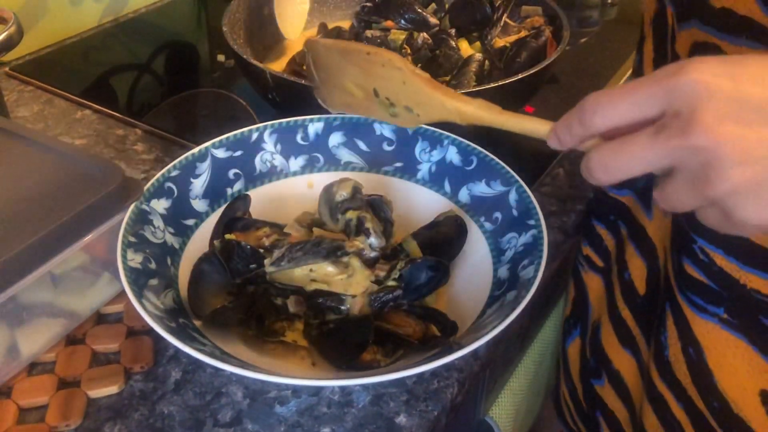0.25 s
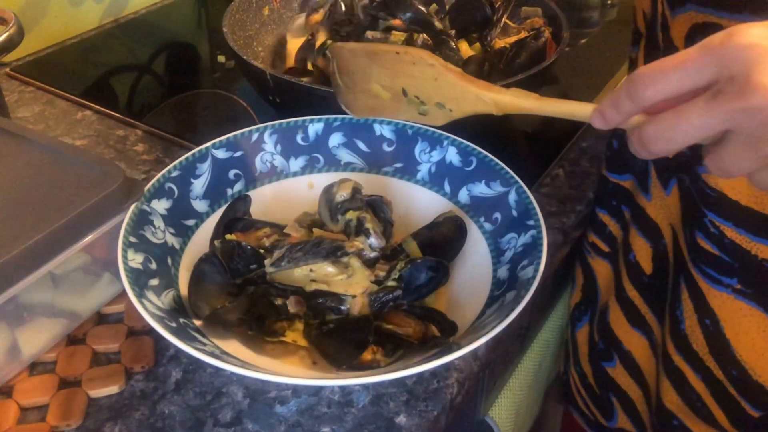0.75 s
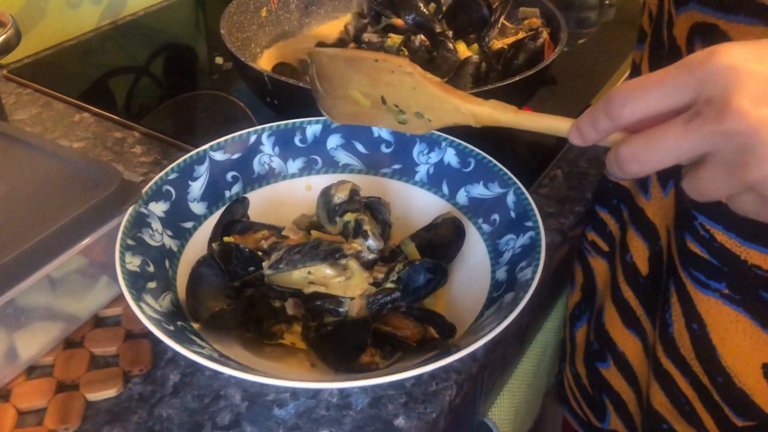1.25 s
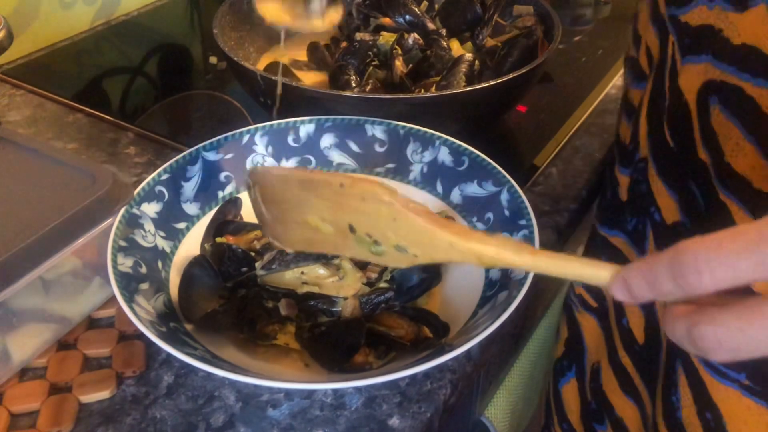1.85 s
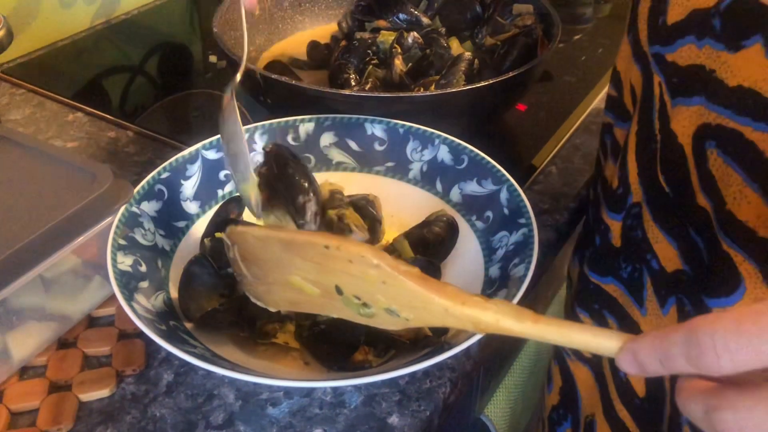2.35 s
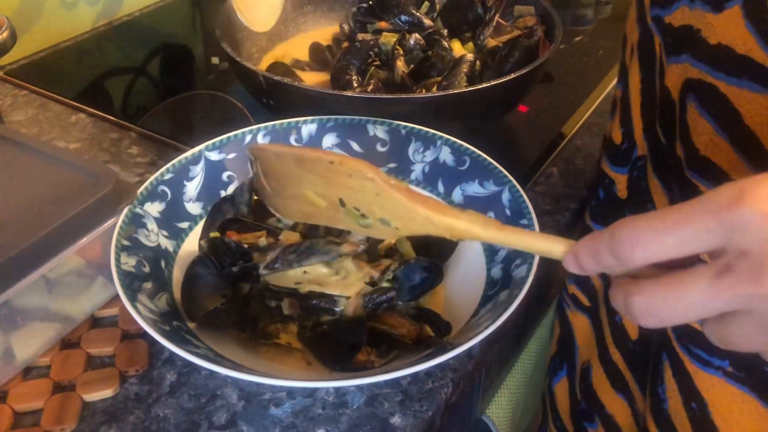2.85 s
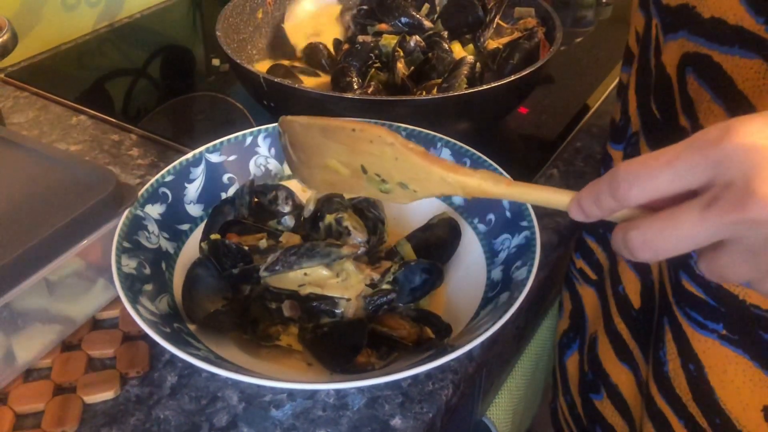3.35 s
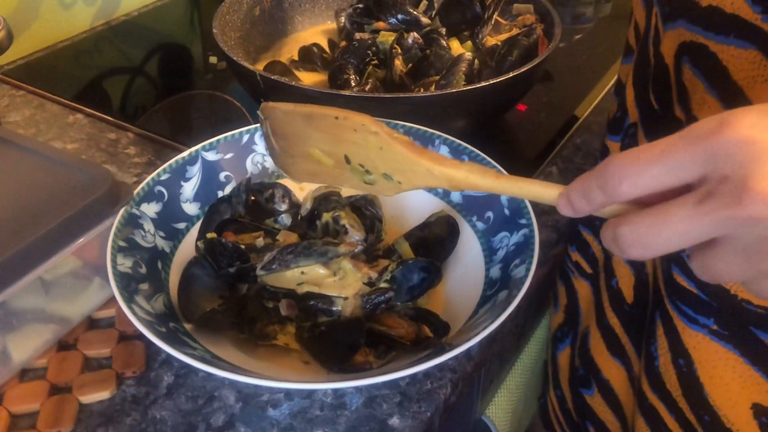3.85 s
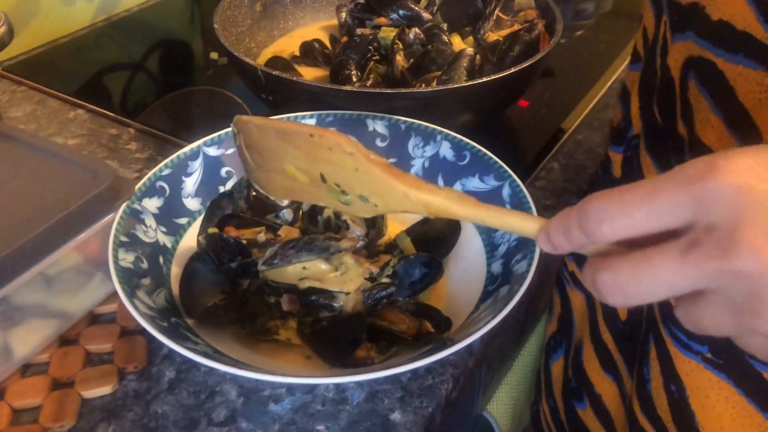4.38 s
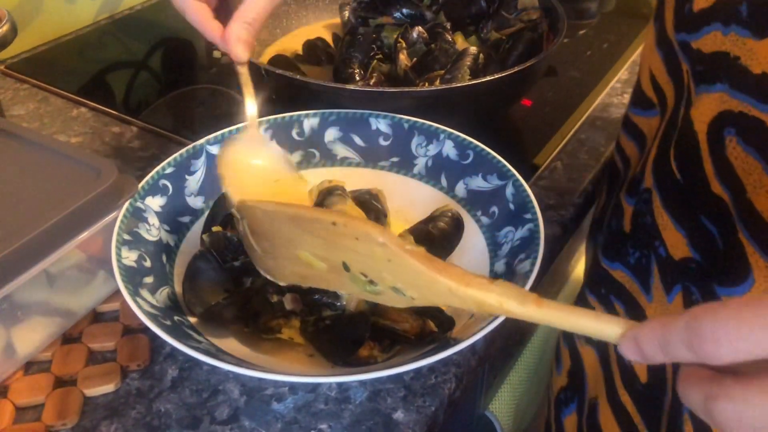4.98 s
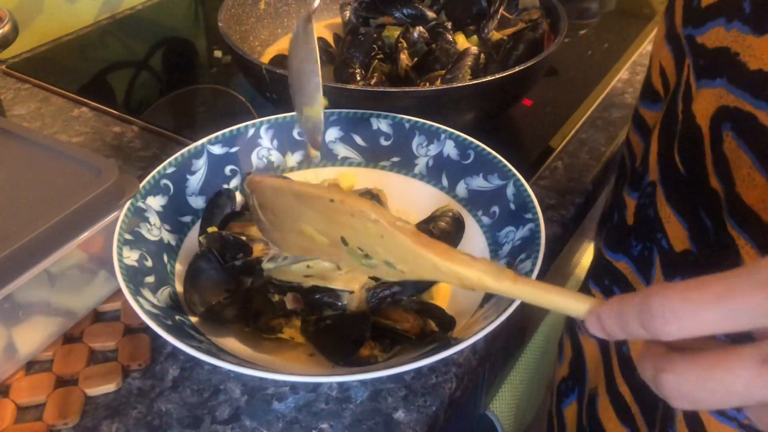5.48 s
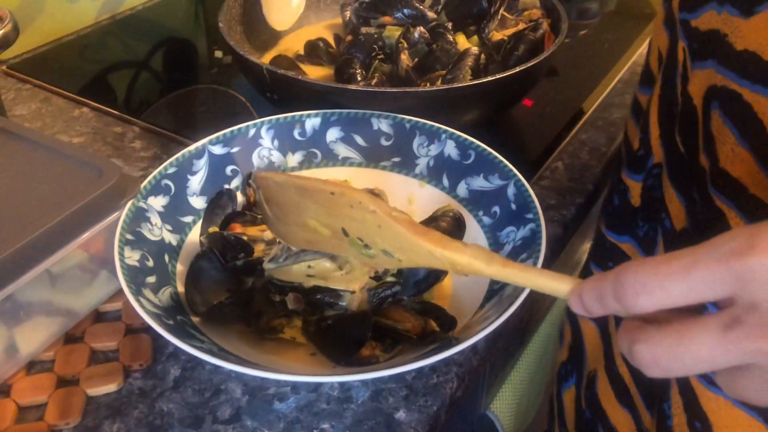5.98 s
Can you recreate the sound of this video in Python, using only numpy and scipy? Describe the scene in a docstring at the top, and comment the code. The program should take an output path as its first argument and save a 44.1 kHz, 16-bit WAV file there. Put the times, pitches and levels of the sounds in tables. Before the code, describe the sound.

Sharp, hollow shell clatter in uneven bursts, with dull pot knocks, a brief spoon ting and faint bowl ring, close in a hard-surfaced kitchen.

```python
"""Mussel shells clack and slide as a steel spoon ladles them from a pot into a ceramic bowl, in a small hard kitchen.
Clacks are short cracks of noise with two shell resonances; slides are swells of gritty noise.
The pot, spoon and bowl ring as sets of fading sine tones; the food knocks and the counter thumps as low noise.
Dense kitchen echoes follow the shells and pot, over quiet rumble, hiss and a thin whine, all in close mono."""
import sys
import numpy as np
from scipy import signal
from scipy.fft import rfft, irfft
from scipy.io import wavfile

SR = 44100
rng = np.random.default_rng(int(sys.argv[2]) if len(sys.argv) > 2 else 0)


def to_linear_factor(level_db):
    """Convert decibel levels (scalar or array-like) to linear amplitude factors."""
    exponent = np.asarray(level_db, float) / 20
    return 10 ** exponent


def unload_wav(signal):
    """Save mono or channel-first audio to the path in sys.argv[1] as 16-bit WAV at rate SR, clipped to [-1, 1]."""
    wavfile.write(
        sys.argv[1],
        SR,
        np.round(np.clip(np.atleast_2d(signal).T, -1, 1) * 32767).astype(np.int16),
    )


N = 274322  # length in samples


def unit(x):
    """Scale to rms 1."""
    return x / np.sqrt(np.mean(x ** 2))


def bell(x, hz, octaves):
    """Keep a bell-shaped band around hz, width in octaves."""
    f = np.maximum(np.fft.rfftfreq(len(x), 1 / SR), 1)
    distance = np.log2(f / hz) / (octaves / 2)
    return irfft(rfft(x) * np.exp(-0.5 * distance ** 2), len(x))


def fade(t, t60):
    """Amplitude that falls 60 dB in t60 s."""
    return np.exp(-np.log(1000) * t / t60)


def add(out, s, x):
    """Mix x into out from time s."""
    i = int(s * SR)
    out[i:i + len(x)] += x[:N - i]


# Sharp shell contacts: t/s, relative level/dB, lower resonance f/Hz, upper resonance f/Hz,
# hardness/dB (sets the treble against the lower resonance; higher is brighter)
SHELL_CLACKS = [(0.381, -33.5, 1130, 3820, -0.5), (0.587, -18.5, 1250, 5220, -14),
                (0.681, -27, 790, 2730, -16.5), (0.76, -25.5, 3700, 4150, -20),
                (0.862, -32.5, 1386, 2680, -30), (0.912, -38, 1480, 3890, -28),
                (1.094, -38, 1960, 2930, -8), (1.181, -37.5, 2400, 2860, -6),
                (1.197, -32.5, 3860, 4660, -8.5), (2.169, -40.5, 2750, 8350, -7),
                (2.224, -34.5, 1250, 2710, -15), (2.236, -30, 2520, 3400, -6),
                (2.395, -38.5, 2450, 3500, -12), (2.469, -25, 1190, 4700, -8.5),
                (2.473, -23, 2360, 2800, -13), (2.577, -40, 1260, 2820, -18), (3.002, -39, 696, 3750, 2.5),
                (3.036, -27.5, 1220, 3420, 2.5), (3.211, -17.5, 2350, 5600, -16),
                (3.239, -15, 1320, 2870, -14), (3.248, -28.5, 1450, 5000, -6),
                (3.33, -18.5, 1800, 3300, -10.5), (3.766, -24, 2270, 6900, -9.5),
                (4.2, -45, 900, 2750, -18), (4.957, -28.5, 1830, 3030, 0), (5.023, -37, 1200, 3140, -18),
                (5.075, -36.5, 1440, 2720, -12), (5.152, -29.5, 1175, 6200, -7.5),
                (6.093, -38, 1090, 3000, -5.5)]


def clacks():
    """Shells knock together: a brief rattling crack, coloured by two shell resonances up to a treble tick."""
    upper_share, upper_lift_db = 0.61, 2  # the upper resonance takes this share of the hardness, plus a lift
    out, t = np.zeros(N), np.arange(2048) / SR
    octave = np.log2(np.maximum(np.fft.rfftfreq(len(t), 1 / SR), 1))
    onset = np.minimum(t / 0.00042, 1) * (t < 0.04)  # contact builds in a fraction of a ms
    for s, db, low_hz, high_hz, hard_db in SHELL_CLACKS:
        crack = rfft(rng.standard_normal(len(t)) * fade(t, 0.017))
        even_crack = crack / np.abs(crack)  # a hard contact excites all frequencies evenly
        low, high = np.log2([low_hz, max(low_hz, high_hz)])
        slope_db = np.interp(octave, [low - 1.6, low, high, np.log2(11000), np.log2(18000)],
                             [-22, 0, upper_share * hard_db + upper_lift_db, hard_db - 2.5, hard_db - 16.5])
        low_bump_db = 8 * np.exp(-((octave - low) / 0.24) ** 2)
        high_bump_db = 8 * np.exp(-((octave - high) / 0.082) ** 2)
        colour = to_linear_factor(db + 23 + slope_db + low_bump_db + high_bump_db)
        add(out, s, onset * irfft(even_crack * colour, len(t)))
    return out


def slides(rows, octaves):
    """Rough rubbing: dense uneven micro-clicks under a flat swell, coloured by what slides."""
    out = np.zeros(N)
    for s, length, db, hz in rows:
        unevenness_db = 7.4 * np.repeat(rng.standard_normal(128), 64)  # a new strength every 64 samples
        grit = rng.standard_normal(8192) * to_linear_factor(unevenness_db)
        samples = int(np.clip(length, 0.004, 0.18) * SR)
        swell = np.sqrt(np.sin(np.linspace(0, np.pi, samples)).clip(0))
        rub = bell(grit, hz, octaves)[:samples] * swell
        add(out, s, to_linear_factor(db) * unit(rub))
    return out


# Shells dragged over shells and steel: start t/s, length t/s, level/dB, centre f/Hz
SHELL_SCRAPES = [(.47, 0.075, -54.5, 5730), (0.548, 0.027, -60, 1210), (.69, 0.01, -45.5, 1190),
                 (0.719, 0.03, -54.5, 1790), (0.772, 0.025, -58, 7000), (0.873, 0.021, -54, 1200),
                 (0.915, 0.023, -54.5, 2070), (0.95, 0.031, -51.5, 1400), (1.09, 0.028, -52, 1990),
                 (1.138, 0.026, -53.5, 1400), (2.283, 0.021, -60, 684), (3.084, 0.15, -65.5, 990),
                 (5.084, 0.068, -54.5, 1800), (5.1, 0.025, -59, 5500), (6.192, 0.076, -55, 680)]


def scrapes():
    """Dragged shells give broad bands of gritty noise."""
    return slides(SHELL_SCRAPES, octaves=2.07)


# Light rubs: start t/s, length t/s, level/dB, centre f/Hz
LIGHT_RUBS = [(.47, 0.085, -55.5, 637), (1.612, 0.047, -61, 12200), (2.15, 0.035, -55.5, 12300),
              (4.957, 0.013, -50, 12800), (2.365, 0.024, -59.5, 2330), (3.676, 0.019, -59, 3100),
              (3.704, 0.014, -53, 12800), (3.712, 0.0074, -57, 2460), (5.04, 0.18, -63.5, 11100)]


def rubs():
    """Light rubs sound in one narrow band each."""
    return slides(LIGHT_RUBS, octaves=0.48)


def struck(modes, blows):
    """Each blow rings the object's modes; where it lands shifts their strengths a little."""
    out, t = np.zeros(N), np.arange(SR // 2) / SR
    hz, db, t60 = np.transpose(modes)[:, :, None]
    for s, blow_db in blows:
        spot, phase = rng.standard_normal((2, len(modes), 1))
        strength = to_linear_factor(blow_db + db + 0.38 * spot)
        tones = np.sin(2 * np.pi * hz * t + phase / 2)
        add(out, s, (strength * tones * fade(t, t60)).sum(0))
    return out


# Ringing tones of the pot: f/Hz, level/dB relative to the blow, time to fall 60 dB t/s
POT_MODES = [(314, -10.5, 0.073), (611, -6.5, 0.035), (1190, -7.5, 0.05), (1400, -33, 0.19),
             (3155, -0.5, 0.011), (3750, -2.5, 0.038), (5370, -2, 0.022), (6410, -6.5, 0.039),
             (7770, -11, 0.029), (9070, -47, .04)]
# Blows on the pot: t/s, level/dB
POT_HITS = [(.380, -32), (0.587, -31.5), (0.678, -57), (3.034, -29), (6.093, -35)]


def pot():
    """The struck pot rings briefly in its own set of fading tones."""
    return struck(POT_MODES, POT_HITS)


# Ringing tones of the steel spoon: f/Hz, level/dB relative to the blow, time to fall 60 dB t/s
SPOON_MODES = [(2620, -19, 0.52), (4500, -11, 0.046), (5560, -5, 0.053), (6540, 0, 0.066),
               (6810, -1, 0.077), (7300, -12, 0.18), (8220, -14.5, 0.17), (9330, -6.5, 0.13),
               (10420, -10, 0.074), (12000, -2.5, 0.063), (13880, -12, .045)]
# Blows on the spoon: t/s, level/dB
SPOON_HITS = [(2.236, -48), (4.958, -44.5), (5.153, -29)]


def spoon():
    """The struck steel spoon rings in high fading tones."""
    return struck(SPOON_MODES, SPOON_HITS)


# Ringing tones of the ceramic bowl: f/Hz, level/dB relative to the blow, time to fall 60 dB t/s
BOWL_MODES = [(318, 8.5, 0.18), (1875, 0, 0.82)]
# Blows on the bowl: t/s, level/dB
BOWL_HITS = [(2.468, -53), (5.153, -57.5)]


def bowl():
    """The struck ceramic bowl rings in a low and a higher tone."""
    return struck(BOWL_MODES, BOWL_HITS)


def thumps(shudders, blows):
    """Low noisy shudders that take a couple of cycles to rise, then fade."""
    out, t = np.zeros(N), np.arange(SR // 2) / SR
    for s, blow_db in blows:
        for hz, db, t60 in shudders:
            rumble = unit(bell(rng.standard_normal(len(t)), hz, 1.67))
            rise = 1 - fade(t, 10.2 / hz)
            add(out, s, to_linear_factor(blow_db + db) * rumble * rise * fade(t, t60))
    return out


# Dull knocks through the food in the pot: t/s, level/dB before the rise and fade
POT_FOOD_KNOCKS = [(.38, -37), (.59, -37.5), (.68, -40.5), (1.1, -46.5), (1.18, -46), (3.002, -45.5),
                   (3.04, -40.5), (3.212, -39.5), (3.24, -34.5), (3.33, -44), (3.77, -43), (6.095, -44)]
# The same in the bowl: t/s, level/dB before the rise and fade
BOWL_FOOD_KNOCKS = [(2.298, -49), (2.47, -38.5), (2.576, -48), (5.074, -48.5), (5.155, -44)]


def knocks():
    """Dull knocks through the food, higher in the pot than in the bowl."""
    pot_hz, bowl_hz, t60_s = 477, 337, 0.17
    return thumps([(pot_hz, 0, t60_s)], POT_FOOD_KNOCKS) + thumps([(bowl_hz, 0, t60_s)], BOWL_FOOD_KNOCKS)


# The counter's two shudders: f/Hz, level/dB relative to the blow, time to fall 60 dB t/s
COUNTER_SHUDDERS = [(42.8, -2, 0.31), (149, -7, .17)]
# Heavy digs: t/s, level/dB before the rise and fade
COUNTER_DIGS = [(0.599, -35), (3.038, -53), (3.246, -28.5), (3.33, -40.5), (6.098, -43.5)]


def counter():
    """Heavy digs shake the counter, which answers with two low shudders."""
    return thumps(COUNTER_SHUDDERS, COUNTER_DIGS)


# How long the late kitchen echoes last: f/Hz, time to fall 60 dB t/s
ECHO_TIMES = [(250, 0.93), (1000, 0.39), (4000, 0.31), (12000, 0.34)]


def kitchen(x):
    """Dense echoes of tiles and cupboards, treble dying sooner; the pattern changes as hands and spoon move."""
    overlap_octaves, echo_db = 1.3, 1  # at this overlap neighbouring octave bands sum flat
    out, t = x.copy(), np.arange(SR // 3) / SR
    size = SR // 8  # each eighth of a second gets a new echo pattern
    hz, t60 = np.transpose(ECHO_TIMES)
    early = np.minimum(t / 0.0012, 1) * (1 + 2.5 * fade(t, 0.084))  # counter and hob answer first and loudest
    for i in range(0, N, size):
        noise = rng.standard_normal(len(t))
        tail = np.zeros(len(t))
        for f in 125 * 2 ** np.arange(8):
            band_t60 = np.interp(np.log(f), np.log(hz), t60)
            tail += bell(noise, f, overlap_octaves) * fade(t, band_t60)
        tail *= early
        tail /= np.sqrt(np.sum(tail ** 2))
        echo = signal.fftconvolve(x[i:i + size], tail)
        add(out, (i + 0.5) / SR, to_linear_factor(echo_db) * echo)  # half a sample guards against rounding down
    return out


# Shape of the rumble and hiss: f/Hz, relative level/dB per Hz
FLOOR_SHAPE = [(12, -34), (20, -5.5), (33, -4.5), (50, 1), (90, -9.5), (191, -10.5), (259, -11.5),
               (298, -12), (439, -15.5), (565, -16.5), (631, -17), (1070, -20), (1870, -23), (2030, -24),
               (15500, -26)]


def floor():
    """Room rumble and microphone hiss are shaped noise; a faint thin whine is one steady sine."""
    noise_db, whine_hz, whine_peak_db = -55, 10450, -74.5  # noise level is rms
    f = np.maximum(np.fft.rfftfreq(N, 1 / SR), 1)
    hz, db = np.transpose(FLOOR_SHAPE)
    shape = to_linear_factor(np.interp(np.log(f), np.log(hz), db))
    hiss = irfft(rfft(rng.standard_normal(N)) * shape, N)
    whine = np.sin(2 * np.pi * whine_hz * np.arange(N) / SR)
    return to_linear_factor(noise_db) * unit(hiss) + to_linear_factor(whine_peak_db) * whine


def scene():
    """Shells and pot fill the kitchen; spoon and bowl ring close by; one microphone feeds both channels."""
    far = clacks() + scrapes() + rubs() + pot()
    near = spoon() + bowl()
    mono = kitchen(far) + near + knocks() + counter() + floor()
    return np.tile(mono, (2, 1))


def roll_off(x):
    """The treble ends steeply here."""
    return signal.sosfilt(signal.butter(12, 17010, fs=SR, output="sos"), x)


def record(dry):
    """Cut the top steeply above 15850 Hz to finish the mix."""
    top_cut = signal.ellip(10, 0.2, 40, 15850, fs=SR, output="sos")
    mix = signal.sosfilt(top_cut, dry)
    return roll_off(mix)


dry = scene()
out = record(dry)
unload_wav(out)
```